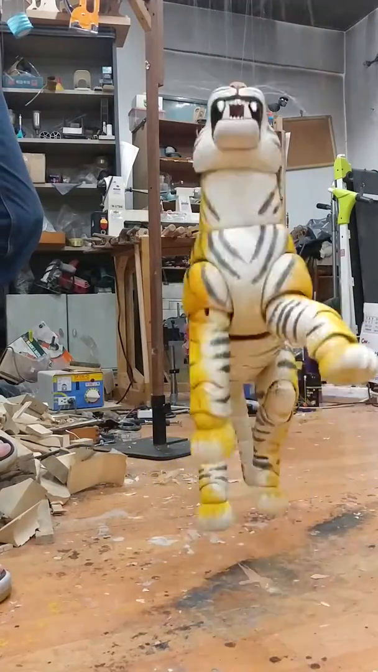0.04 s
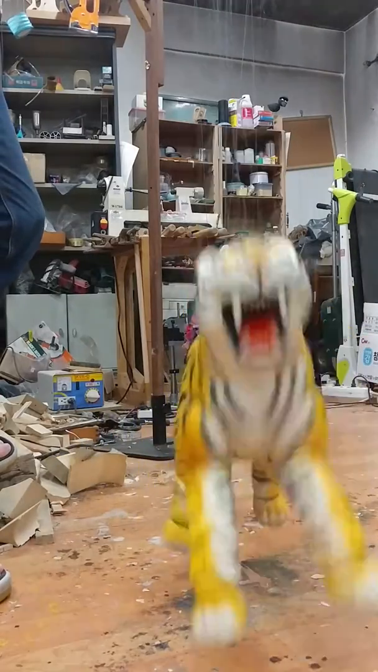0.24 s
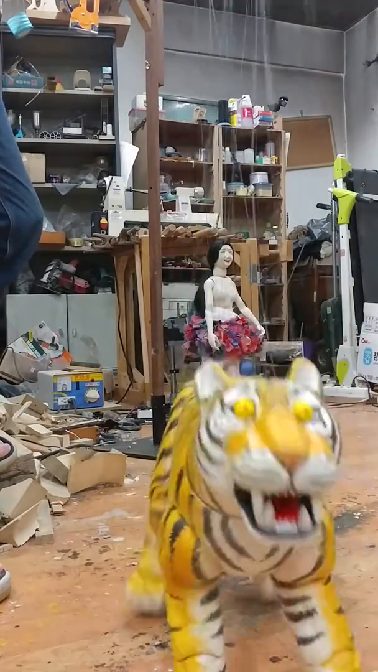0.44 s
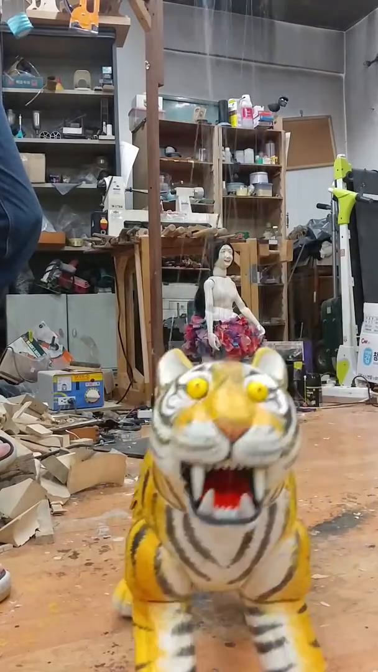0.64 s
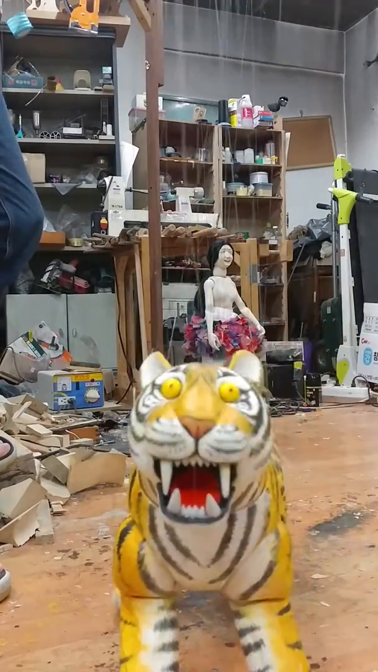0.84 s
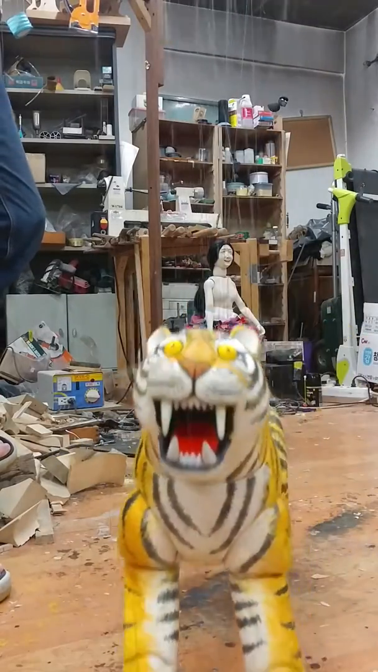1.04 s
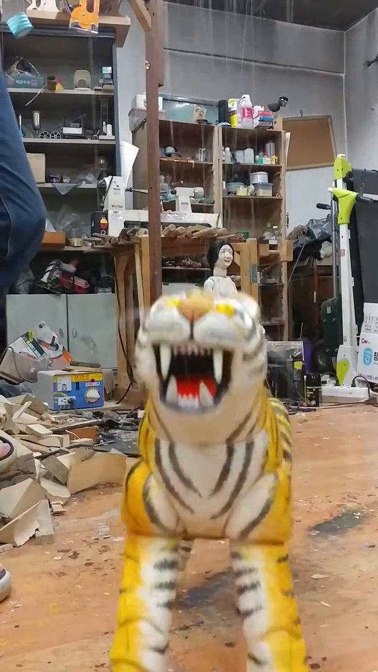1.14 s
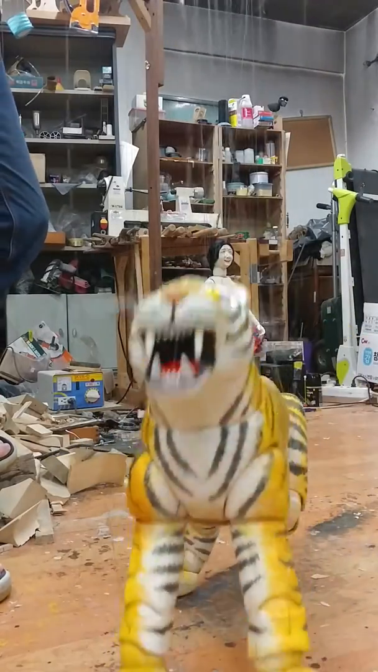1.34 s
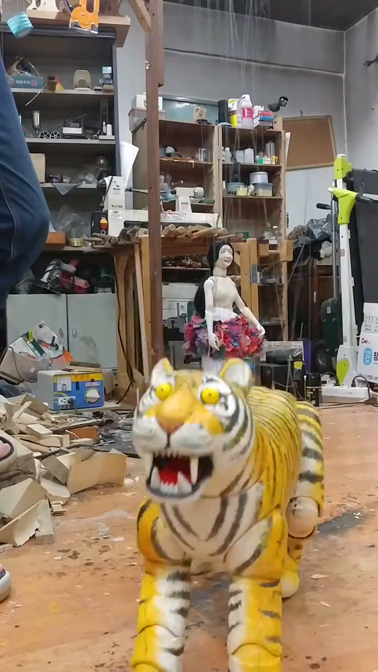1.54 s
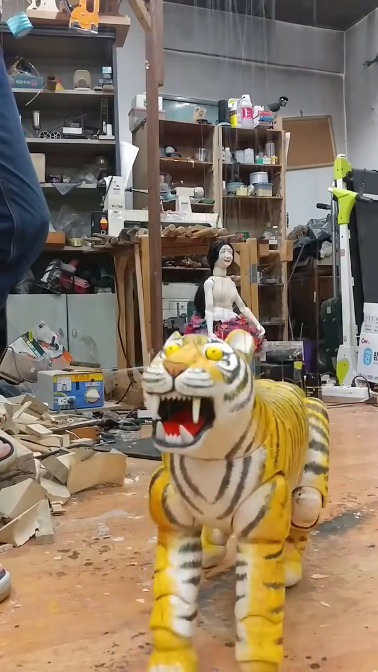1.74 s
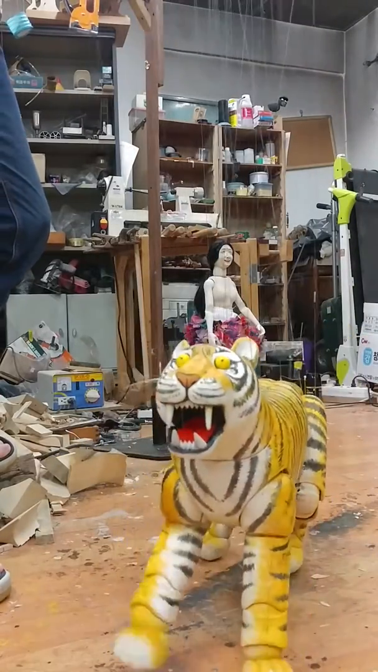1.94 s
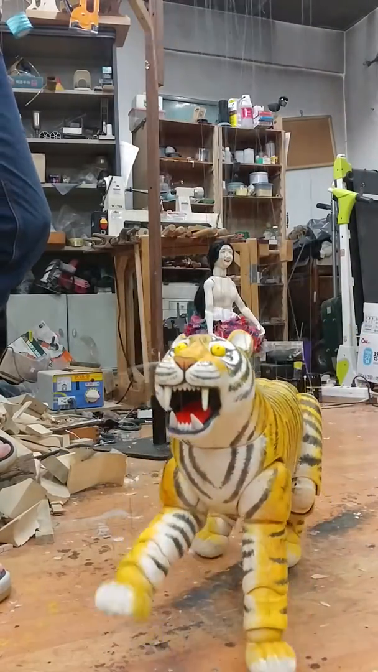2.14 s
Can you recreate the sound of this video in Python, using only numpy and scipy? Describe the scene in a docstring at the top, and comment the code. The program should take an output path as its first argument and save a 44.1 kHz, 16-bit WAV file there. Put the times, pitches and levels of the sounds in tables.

```python
"""A carved wooden marionette drops onto a wooden workshop floor, rears up and drops again.
Its hollow body and the boards give round knocks; paws and joints add hard clacks and ring on.
Between blows, tiny slips of wood on wood make the limbs rub and the dry joints squeak.
The room answers each blow with a short tail, over a bed of quiet air and faint low rumble."""
import sys
import numpy as np
from scipy import signal
from scipy.fft import rfft, irfft
from scipy.io import wavfile
from scipy.ndimage import uniform_filter1d

SR = 44100
rng = np.random.default_rng(int(sys.argv[2]) if len(sys.argv) > 2 else 0)


def digitize_waveform(pressure):
    """Quantize a signal to 16-bit integers and store it at the path in sys.argv[1].

    Rows of a 2-D input are taken as channels; values are limited to [-1, 1].
    """
    field = np.atleast_2d(pressure).T
    bounded = np.clip(field, -1, 1)
    quanta = np.round(bounded * 32767).astype(np.int16)
    wavfile.write(sys.argv[1], SR, quanta)


N = 97020

# Hollow knocks of body and paws on the boards: start_s, level_db, pitch_hz, t60_s
BODY_KNOCKS = [(.001, -38, 315, 0.085), (0.2311, -17, 296.7, 0.073), (0.2455, -20, 307, 0.051),
               (.3212, -4.5, 810, 0.011), (0.3217, -27.5, 317, 0.12), (0.351, -20.5, 320, 0.036),
               (0.404, -22, 202.7, 0.17), (.443, -12.5, 356, 0.069), (0.45, -12, 211.5, 0.054),
               (0.4562, -13, 379, 0.041), (.5185, -25, 618, 0.022), (0.519, -20, 221, 0.11),
               (0.5565, -9, 347.6, 0.044), (0.567, -22, 360.4, 0.094), (0.621, -30, 354, 0.1),
               (.627, -32, 210, 0.13), (.650, -29, 302, 0.049), (0.667, -28, 398.3, 0.067),
               (0.69, -28.5, 415, 0.039), (0.7771, -35, 215.3, 0.089), (0.793, -35, 183, 0.047),
               (.921, -42.5, 220.5, 0.079), (1.033, -50, 374, 0.076), (1.198, -41.5, 379.6, 0.058),
               (1.454, -33, 359, 0.061), (1.4709, -20.5, 223, 0.058), (1.491, -14.5, 202, 0.13),
               (1.5133, -21.5, 236.4, 0.1), (1.5674, -16, 353, 0.052), (1.69, -45, 217.4, 0.17),
               (1.724, -53, 266, 0.1), (1.606, -37.5, 352, .1), (1.757, -61.5, 377, 0.22),
               (1.798, -45, 402.7, 0.14), (1.815, -44.5, 201.6, 0.064), (1.919, -50, 391, 0.11),
               (1.959, -46.5, 417, 0.084), (1.989, -45, 396, 0.078), (2.01, -45, 421, 0.11)]
# Hard wood-on-wood hits, voiced by band_gains: start_s, low_db, middle_db, bright_db, treble_db, left_db
JOINT_CLACKS = [(.0438, -55, -45.5, -35.5, -114, 5), (.232, -33, -29.5, -57, -60, 6),
                (.2659, -45, -34, -31, -60, 7), (.273, -36, -26.5, -24.5, -39, 2),
                (.312, -44.5, -28, -47.5, -33.5, 3), (0.3219, -28, -21.5, -45.5, -43, 0),
                (.350, -52, -27.5, -26, -54, 9), (0.3717, -35.5, -24.5, -21, -41.5, 0),
                (.404, -28.5, -22.5, -18, -31.5, 3.5), (.4078, -25, -25, -34, -32.5, 3),
                (.416, -28.5, -25.5, -23.5, -44, -5), (.430, -35.5, -30, -24.5, -38.5, -2),
                (.448, -48, -27.5, -23.5, -36.5, -3.5), (.4835, -27, -34.5, -24, -44.5, -0.5),
                (0.4941, -32.5, -26.5, -19, -45.5, 3), (.5201, -39.5, -24, -30, -55, -1),
                (0.5274, -31, -44, -30, -48, -7), (.56, -31.5, -27, -20, -53, -.5),
                (.576, -40, -25.5, -61, -38, 7.5), (0.6649, -40.5, -26, -34, -64, 2),
                (0.7128, -39.5, -32.5, -33, -54.5, 0), (0.8788, -54, -40, -50, -80.5, 9),
                (1.1973, -60, -48.5, -65, -76, 3.5), (1.4684, -36.5, -34.5, -24, -35.5, 2.5),
                (1.480, -43.5, -48, -24, -42, 6), (1.4896, -29.5, -25, -21, -27.5, 3),
                (1.4943, -35, -18, -22, -36, 1), (1.5025, -27.5, -29.5, -25.5, -34.5, -4),
                (1.512, -33, -43.5, -34.5, -34.5, -10.5), (1.523, -38.5, -39, -26.5, -30.5, -0.5),
                (1.691, -56, -42, -45, -55.5, 4.5), (1.712, -61, -59, -56.5, -58, -3),
                (1.7421, -71, -65.5, -68.5, -52, 3.5)]
# Clack decay in the low, middle, bright, edge and treble bands: t60_s
CLACK_T60_S = [0.043, 0.028, 0.019, 0.042, 0.025]
# Crossovers between those five bands: frequency_hz
CROSSOVERS_HZ = [480, 1200, 2400, 4100]
# Tone colour of the wood: frequency_hz, gain_db
WOOD_EQ = [(30, -61), (60, -31), (120, -13), (190, 1), (380, 3.5), (500, -2), (650, -3), (1000, 2.5),
           (1180, -3), (1500, 5), (2400, 3), (3400, 4.5), (4600, -2.5), (5800, 1), (7000, -8), (9000, -3.5),
           (10600, -15.5), (12500, -8.5), (14500, -17.5), (16000, -25)]
# Limbs and jaw ringing on after a hit: start_s, level_db, pitch_hz, t60_s
LIMB_RINGS = [(0.2656, -23.5, 1560, 0.045), (.273, -25.5, 2827, 0.093), (0.2744, -29, 3400, 0.065),
              (0.2786, -24, 1354, 0.12), (.318, -29.5, 2800, 0.067), (0.3715, -31, 4740, 0.022),
              (.4045, -13.5, 2230, 0.022), (.416, -21.5, 2075, 0.042), (.448, -21.5, 620, 0.077),
              (0.4832, -26.5, 1420, 0.072), (.5201, -24.5, 850, .06), (0.6655, -27, 1735, 0.017),
              (0.6658, -41, 3442, 0.085), (0.678, -40, 1572, 0.059), (.689, -47, 3350, 0.099),
              (1.4688, -21.5, 2790, 0.014), (1.5025, -31.5, 2070, 0.07), (1.689, -42.5, 4120, 0.027),
              (1.6915, -41, 2910, 0.047), (1.719, -47, 3000, .04)]
# Rubs and scuffs, voiced by band_gains: start_s, rise_s, fall_s, low_db, middle_db, bright_db, treble_db
LIMB_RUBS = [(0, 0.0014, 0.063, -58, -46, -52, -80), (.043, 0.011, 0.13, -65.5, -52.5, -59.5, -61),
             (0.177, 0.01, 0.45, -56, -64, -67.5, -63), (0.224, 0.0093, 0.51, -49, -44.5, -45.5, -62.5),
             (0.258, 0.039, 0.52, -43.5, -35, -38, -47.5), (0.418, 0.11, 0.27, -39, -35, -49.5, -48),
             (0.893, 0.0083, 0.1, -51, -44.5, -53.5, -63.5), (0.908, 0.021, 0.078, -53.5, -53, -54.5, -76),
             (1.448, 0.0054, 0.089, -52, -51.5, -49.5, -65), (.97, 0.025, 0.23, -68.5, -79, -75, -65),
             (1.069, 0.012, 0.25, -65.5, -61.5, -69.5, -69), (1.19, 0.037, 0.21, -60, -65, -66, -101),
             (1.37, 0.15, 0.18, -55, -69.5, -59.5, -54.5), (1.472, 0.053, .22, -43.5, -37.5, -44, -67),
             (1.686, 0.0097, 0.083, -49.5, -53, -49.5, -66), (1.74, 0.02, 0.16, -52, -57, -61.5, -58.5),
             (1.792, 0.015, 0.056, -63, -51.5, -60, -72), (1.81, 0.021, 0.064, -59.5, -62, -62.5, -59),
             (1.925, 0.025, 0.19, -56, -64, -67, -62), (2.005, 0.023, 0.044, -59, -67.5, -79.5, -78.5)]
# Dry scrapes of joints and strings: start_s, rise_s, fall_s, centre_hz, width_hz, level_db
JOINT_SQUEAKS = [(.897, 0.015, 0.095, 1700, 460, -51.5), (1.686, 0.0063, 0.17, 4550, 660, -54),
                 (1.755, .008, 0.14, 3980, 250, -61), (1.805, 0.0034, 0.056, 5170, 120, -60.5),
                 (1.805, .003, 0.092, 7850, 450, -61.5), (1.82, .014, 0.084, 5650, 350, -60.5)]
# Length of the room's tail: frequency_hz, t60_s
ROOM_DECAY = [(100, 0.45), (300, 0.37), (900, 0.3), (2000, 0.34), (8000, 0.34), (16000, 0.4)]
# Tone colour of the room air: frequency_hz, gain_db
AIR_EQ = [(10, -39), (30, -26.5), (50, -12), (80, 3.5), (130, -4.5), (250, -4), (400, -12), (800, -16.5),
          (2000, -23), (5000, -21), (9000, -27), (10700, -28.5), (13000, -23), (16000, -29.5)]
# Fader moves of the low rumble: time_s, gain_db
RUMBLE_FADER = [(0.0, -60.5), (0.2, -60.5), (0.31, -45), (0.39, -60.5), (0.43, -58.5), (0.59, -68),
                (0.67, -48.5), (0.76, -69), (0.88, -55.5), (0.91, -63.5), (1.41, -61.5), (1.48, -48),
                (1.74, -61.5), (1.83, -54), (2.15, -65.5), (2.2, -54.5)]
# How alike left and right are: frequency_hz, correlation
STEREO_LIKENESS = [(50, 0.93), (280, 0.82), (500, 0.95), (800, 0.64), (1300, -0.38), (2500, 0.058),
                   (16000, -0.27)]
# Colour difference between the microphones: frequency_hz, left_minus_right_db
MIC_BALANCE = [(60, 2.5), (170, -4), (330, 2.1), (700, -1), (1400, -3.5), (2800, 1.5), (5500, 1.5),
               (9000, 10.5), (13000, -2)]
# Level under which noise suppression turns a band down: frequency_hz, threshold_db
SUPPRESSION_THRESHOLD = [(100, -65), (400, -64.5), (1200, -64), (3000, -70), (8000, -89.5), (16000, -95)]


def body_knocks():
    """A blunt blow on the boards rings one hollow mode and a weaker, shorter overtone."""
    rise_s, overtone_db = .0017, -15.5
    out, t = np.zeros((2, N)), np.arange(SR // 4) / SR
    attack = 1 - np.exp(-(t / rise_s) ** 2)
    for start_s, level_db, pitch_hz, t60_s in BODY_KNOCKS:
        overtone_hz = pitch_hz * 1.85 * (1 + .12 * rng.uniform(-1.18, 1))  # varies from blow to blow
        body = np.sin(2 * np.pi * pitch_hz * t) * decay(t, t60_s)
        overtone = amp(overtone_db) * np.sin(2 * np.pi * overtone_hz * t) * decay(t, .73 * t60_s)
        add(out, start_s, -amp(level_db) * (body + overtone) * attack)
    return out


def joint_clacks():
    """A hard hit of a paw or joint sets off a dense cluster of short modes, played as decaying noise."""
    crack_above_db, crack_s = -32.5, .0016
    firm_db, firm_rise_s, soft_extra_s = -20, .0003, .0017
    out, t = np.zeros((2, N)), np.arange(SR // 6) / SR
    fades = decay(t, np.array(CLACK_T60_S)[:, None, None])
    for start_s, low_db, middle_db, bright_db, treble_db, left_db in JOINT_CLACKS:
        cluster = wood_bands(rng.standard_normal((2, len(t)))) * fades
        # Hold each band's energy steady, however the noise falls.
        cluster *= np.sqrt((fades ** 2).mean(-1, keepdims=True) / (cluster ** 2).mean(-1, keepdims=True))
        clack = np.tensordot(band_gains(low_db, middle_db, bright_db, treble_db), cluster, 1)
        # Hits rich in treble open with a crack; soft ones have a slower attack.
        crack = 1 + amp(.5) * max(1 - amp(crack_above_db - treble_db), 0) * np.exp(-t / crack_s)
        rise_s = firm_rise_s + soft_extra_s * max(1 - amp(bright_db - firm_db), 0)
        pan = amp([[left_db / 2], [-left_db / 2]])
        add(out, start_s, crack * clack * (1 - np.exp(-t / rise_s)) * pan)
    return out


def limb_rings(rise_s=.0006):
    """A limb or the jaw, left free after a hit, rings on in one mode."""
    out, t = np.zeros((2, N)), np.arange(SR // 4) / SR
    for start_s, level_db, pitch_hz, t60_s in LIMB_RINGS:
        phases = np.pi * rng.random((2, 1))
        ring = np.sin(2 * np.pi * pitch_hz * t + phases) * decay(t, t60_s)
        add(out, start_s, amp(level_db) * ring * (1 - np.exp(-t / rise_s)))
    return out


def limb_rubs(slips_per_s=4000, spread_db=1.5):
    """Many tiny slips of wood on wood blur into a grainy rub that swells and fades with each stroke."""
    t = np.arange(N) / SR
    slips = (rng.random(N) < slips_per_s / SR) * amp(spread_db * np.minimum(rng.exponential(1, N), 4))
    bands = wood_bands(slips * rng.standard_normal((2, N)))
    power = np.zeros((len(bands), N))
    for start_s, rise_s, fall_s, *levels_db in LIMB_RUBS:
        power += (band_gains(*levels_db)[:, None] * stroke(t - start_s, rise_s, fall_s)) ** 2
    return (bands * np.sqrt(power)[:, None]).sum(0)


def joint_squeaks(slips_per_s=3000):
    """Uneven slips of a dry joint or string excite a narrow, high resonance."""
    t, hz = np.arange(N) / SR, np.fft.rfftfreq(N, 1 / SR)
    out = np.zeros((2, N))
    for start_s, rise_s, fall_s, centre_hz, width_hz, level_db in JOINT_SQUEAKS:
        slips = (rng.random(N) < slips_per_s / SR) * rng.standard_normal((2, N))
        ringing = irfft(rfft(slips) / (1 + 1j * (hz - centre_hz) / width_hz) ** 2, N)
        out += amp(level_db) * unit_rms(ringing) * stroke(t - start_s, rise_s, fall_s)
    return out


def room_tail(send, predelay_s=.0059, build_s=.0045):
    """Dense reflections from shelves and walls, each band dying at its own speed."""
    size = SR * 3 // 4
    reflections = irfft(stereo_spectra(rng.standard_normal((2, size)))[1], size)
    hz, t, spectra = signal.stft(reflections, SR, nperseg=256)
    tail = signal.istft(spectra * decay(t, curve(ROOM_DECAY, hz)[:, None]), SR, nperseg=256)[1]
    tail *= np.clip((np.arange(tail.shape[1]) / SR - predelay_s) / build_s, 0, 1)
    tail /= np.linalg.norm(tail, axis=1, keepdims=True)
    return signal.fftconvolve(send, tail, axes=1)[:, :N]


def room_air(level_db=-60.5):
    """A steady, dark bed of quiet noise."""
    hz, noise = stereo_spectra(rng.standard_normal((2, N)))
    return amp(level_db) * unit_rms(irfft(noise * amp(curve(AIR_EQ, hz)), N))


def low_rumble(centre_hz=51.7, width_hz=4.7, trim_db=1):
    """A narrow band of bass noise that swells and sinks."""
    hz, noise = stereo_spectra(rng.standard_normal((2, N)))
    rumble = irfft(noise / (1 + ((hz - centre_hz) / width_hz) ** 2) ** 2, N)
    envelope = abs(signal.hilbert(rumble)).mean(0)
    compressed = unit_rms(rumble / np.sqrt(envelope))
    fader_db = np.interp(np.arange(N) / SR, *np.transpose(RUMBLE_FADER))
    return compressed * amp(fader_db + trim_db)


def wood_bands(drive):
    """Colours a drive with the wood and splits it into five bands of rms 1."""
    hz, spectra = stereo_spectra(drive)
    spectra *= amp(curve(WOOD_EQ, hz))
    lowpasses = [1 / (1 + (hz / crossover_hz) ** 14) for crossover_hz in CROSSOVERS_HZ]
    shares = np.diff(lowpasses, axis=0, prepend=0, append=1)
    return np.array([unit_rms(irfft(spectra * np.sqrt(abs(share)), drive.shape[1])) for share in shares])


def band_gains(low_db, middle_db, bright_db, treble_db):
    """Five gains from four levels: bright is trimmed, and the edge band follows bright and treble."""
    trimmed_db = bright_db - 3.5
    edge_db = trimmed_db + 1.5 + .32 * (treble_db - bright_db)
    return amp([low_db, middle_db, trimmed_db, edge_db, treble_db])


def stereo_spectra(pair):
    """Spectra of two unrelated signals, made alike in the bass as at two close microphones."""
    spectra, hz = rfft(pair), np.fft.rfftfreq(pair.shape[1], 1 / SR)
    likeness = curve(STEREO_LIKENESS, hz)
    mid = spectra[0] * np.sqrt((1 + likeness) / 2)
    side = spectra[1] * np.sqrt((1 - likeness) / 2)
    return hz, np.array([mid + side, mid - side])


def stroke(t, rise_s, fall_s):
    """A rubbing stroke swells, then fades 30 dB in fall_s."""
    return np.clip(t / max(rise_s, .002), 0, 1) * decay(np.maximum(t - rise_s, 0), 2 * fall_s)


def decay(t, t60_s):
    """Falls 60 dB in t60_s."""
    return 1000. ** (-t / t60_s)


def amp(db):
    """Decibels to gain."""
    return 10 ** (np.asarray(db) / 20)


def unit_rms(sound):
    """Scales to rms 1."""
    return sound / np.sqrt(np.mean(sound ** 2) + 1e-20)


def curve(points, hz):
    """Reads a table on a log-frequency axis."""
    points_hz, values = np.transpose(points)
    return np.interp(np.log(hz + 1), np.log(points_hz + 1), values)


def add(mix, start_s, sound):
    """Mixes a sound in at start_s."""
    part = mix[:, round(start_s * SR):][:, :sound.shape[-1]]
    part += sound[..., :part.shape[1]]


def noise_suppression(sound, depth_db=-5):
    """Bands that sink near the noise floor are turned down, which tightens faint tails."""
    hz, _, spectra = signal.stft(sound, SR, nperseg=1024, noverlap=768)
    power = uniform_filter1d((abs(spectra) ** 2).mean(0), size=9, axis=0)  # smooth over frequency
    power = abs(uniform_filter1d(power, size=3, axis=1))  # then over time
    threshold = amp(curve(SUPPRESSION_THRESHOLD, hz))[:, None] ** 2
    cut_db = depth_db / (1 + (power / threshold) ** 2)
    return signal.istft(spectra * amp(cut_db), SR, nperseg=1024, noverlap=768)[1][:, :N]


def scene():
    """The puppet's five layers, each with its own send to the room, over air and rumble."""
    knocks, clacks, rings = body_knocks(), joint_clacks(), limb_rings()
    rubs, squeaks = limb_rubs(), joint_squeaks()
    wet = room_tail(amp(-13.5) * knocks + amp(-5.5) * rubs + amp(-8) * squeaks)
    wet += room_tail(amp(-4.5) * clacks + amp(-9.5) * rings)
    return knocks + clacks + rings + rubs + squeaks + wet + room_air() + low_rumble()


def record(dry):
    """Two microphones of unlike colour, a low cut, noise suppression, then a steep high cut."""
    low_cut_hz, high_cut_hz = 25, 15900
    hz = np.fft.rfftfreq(2 * N, 1 / SR)
    tilt_db = curve(MIC_BALANCE, hz) / 2
    low_cut = 1 - 1 / (1 + (hz / low_cut_hz) ** 6)
    coloured = irfft(rfft(dry, 2 * N) * amp([tilt_db, -tilt_db]) * low_cut)[:, :N]
    high_cut = signal.firwin(511, high_cut_hz, window=("kaiser", 9), fs=SR)
    return signal.oaconvolve(noise_suppression(coloured), high_cut[None], "same")


dry = scene()
out = record(dry)
digitize_waveform(out)
```